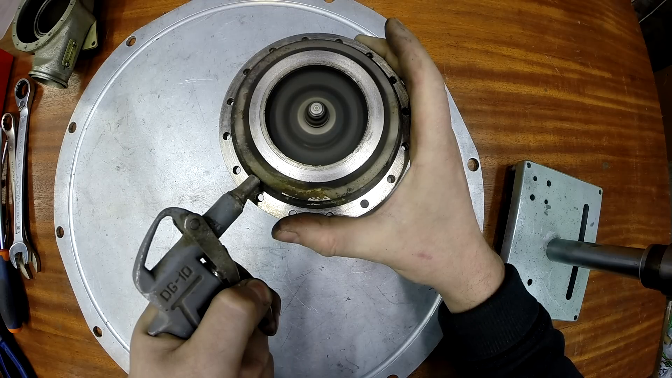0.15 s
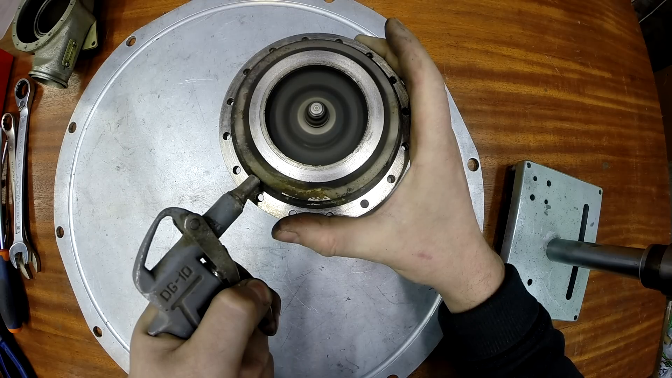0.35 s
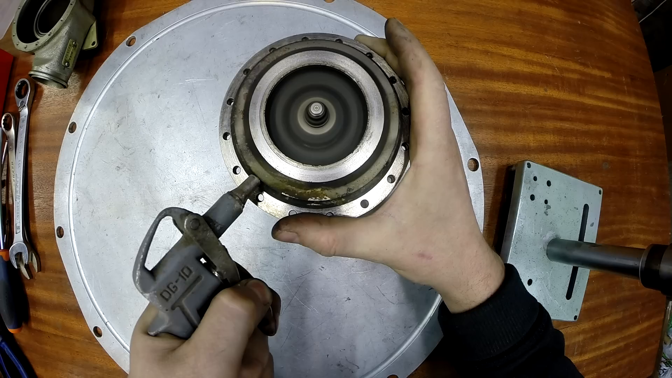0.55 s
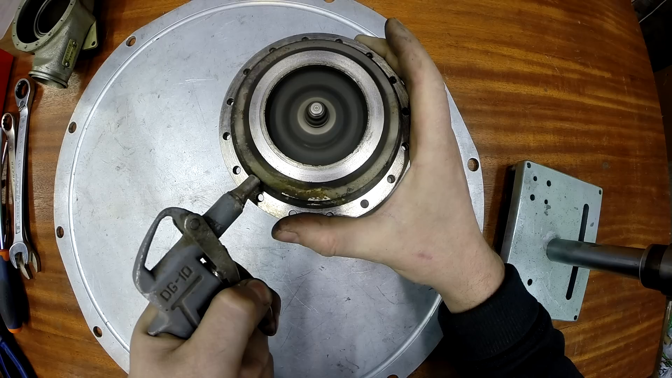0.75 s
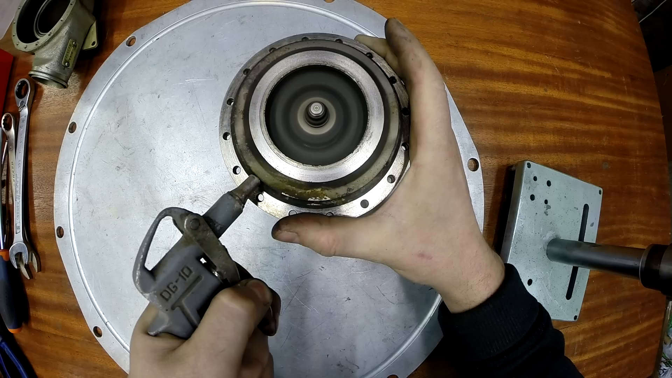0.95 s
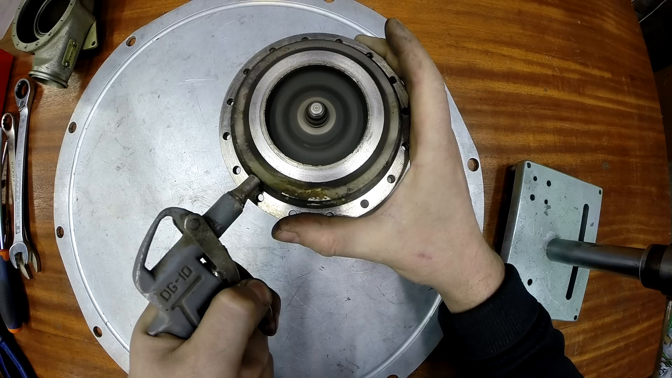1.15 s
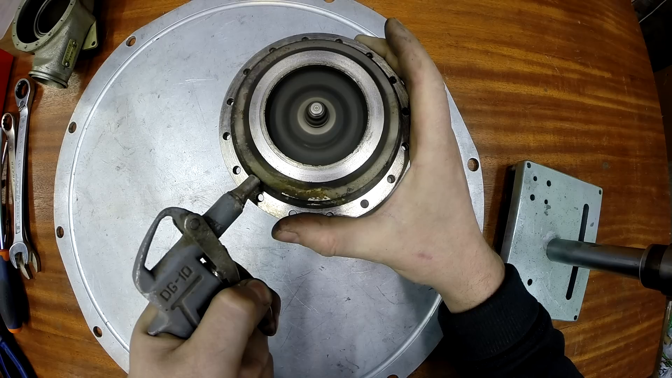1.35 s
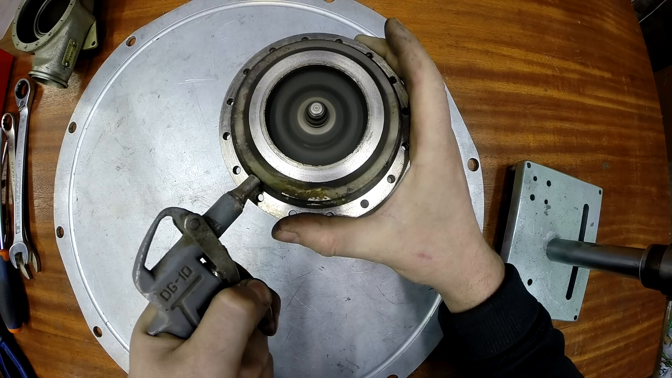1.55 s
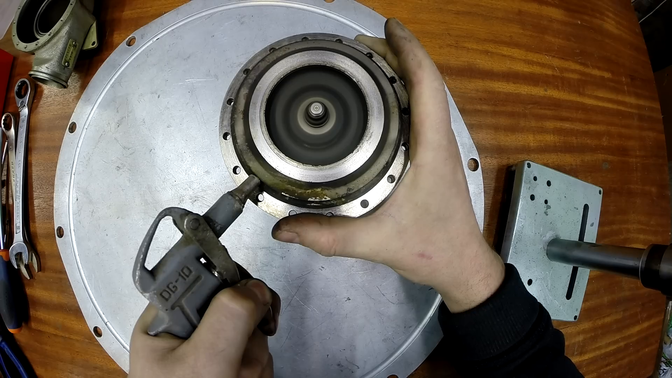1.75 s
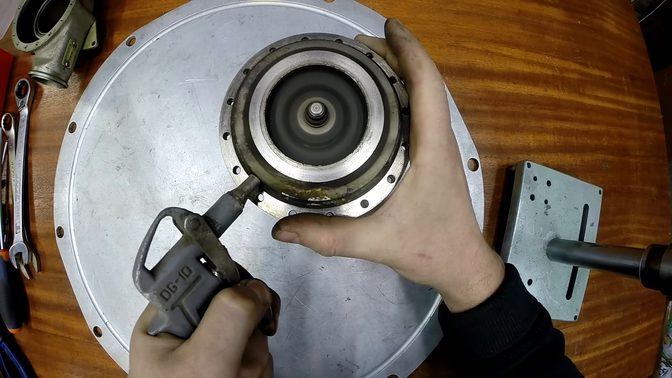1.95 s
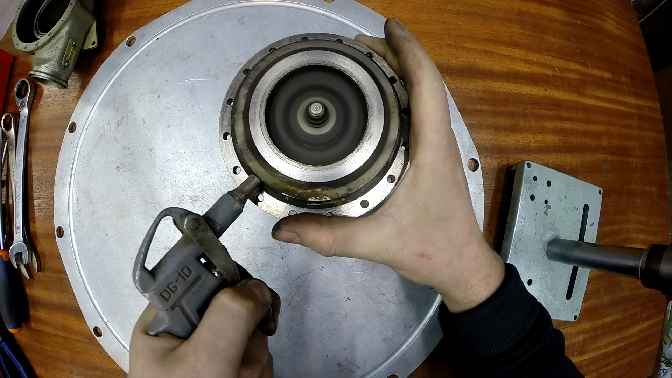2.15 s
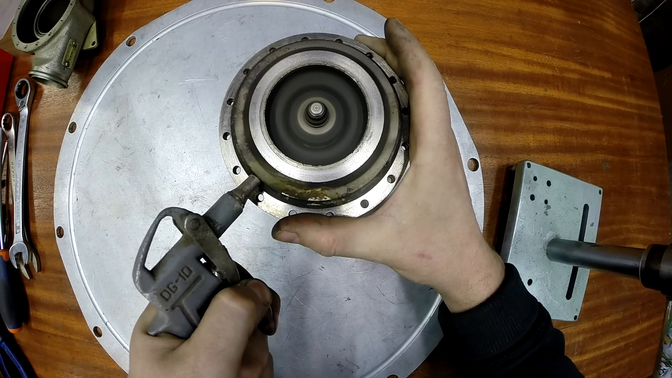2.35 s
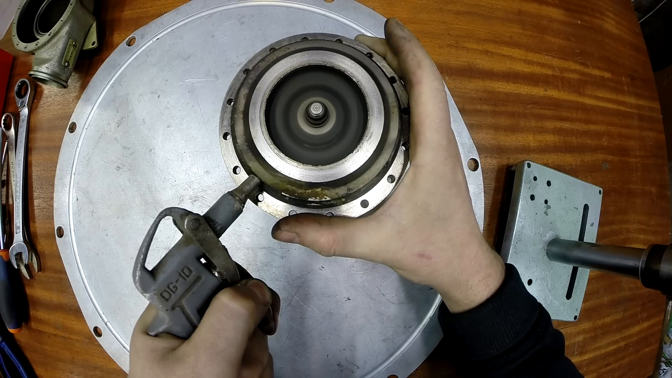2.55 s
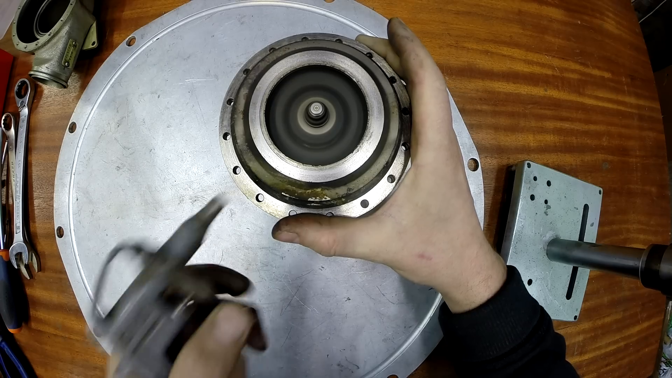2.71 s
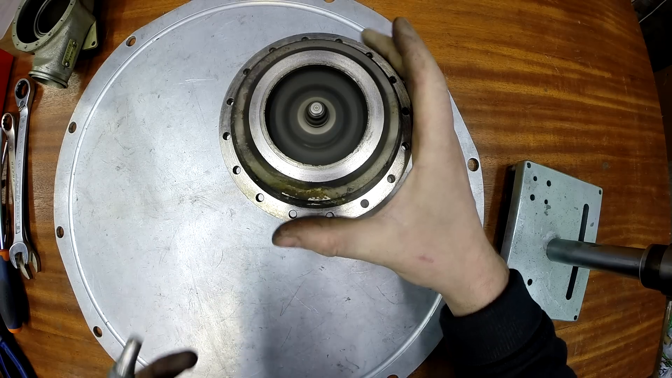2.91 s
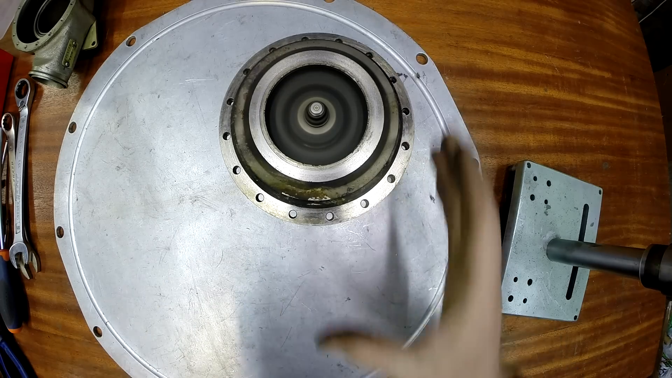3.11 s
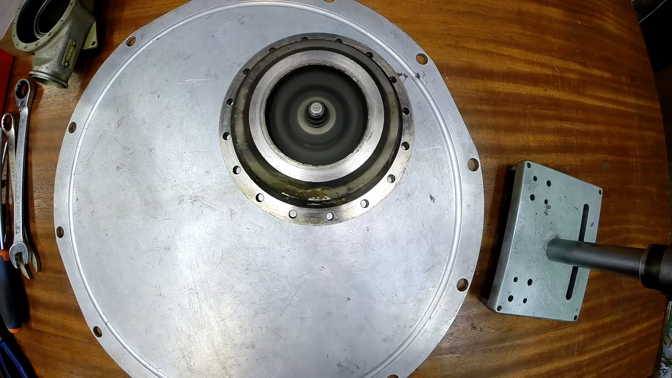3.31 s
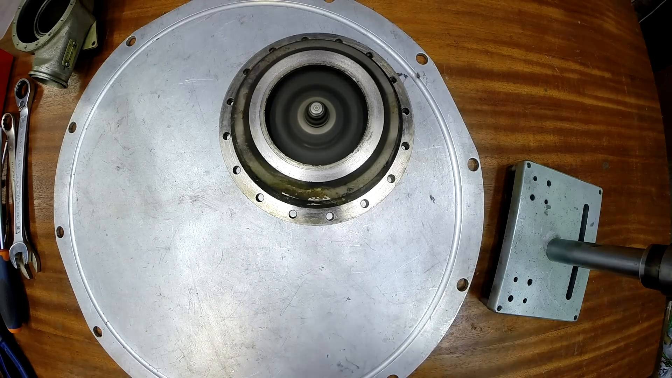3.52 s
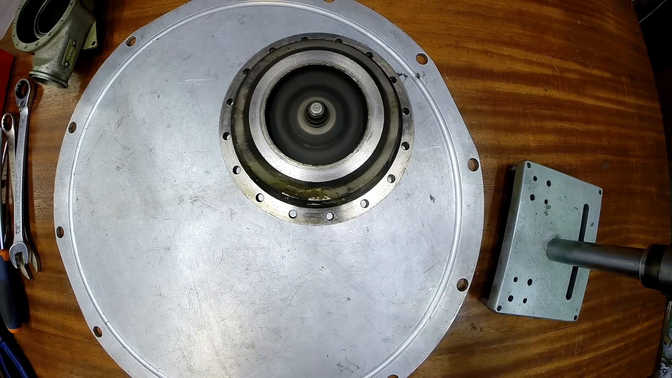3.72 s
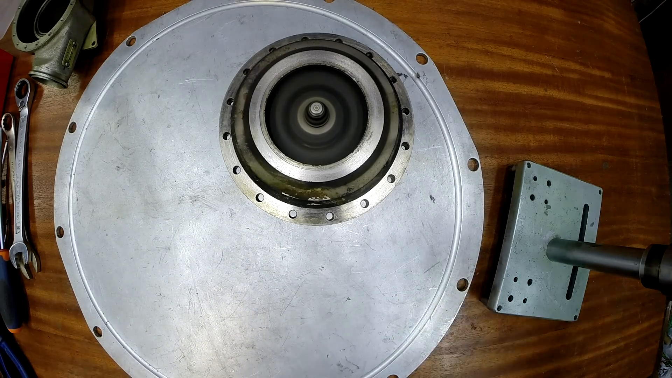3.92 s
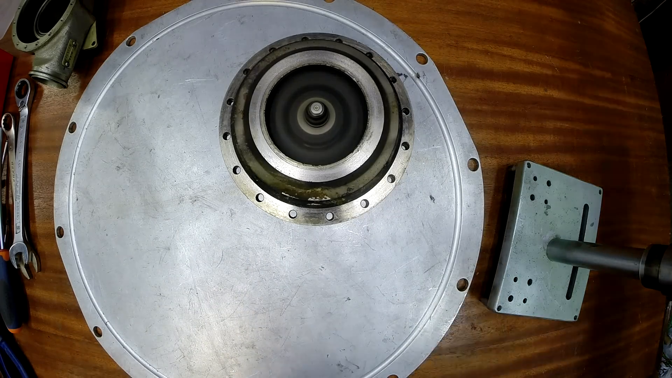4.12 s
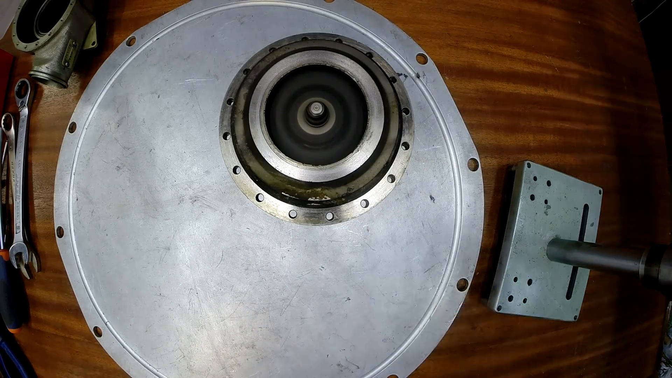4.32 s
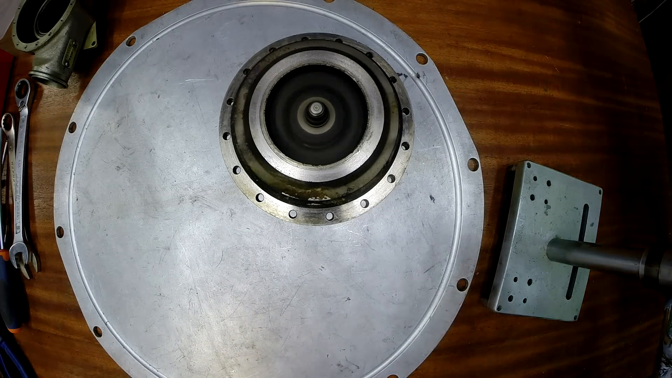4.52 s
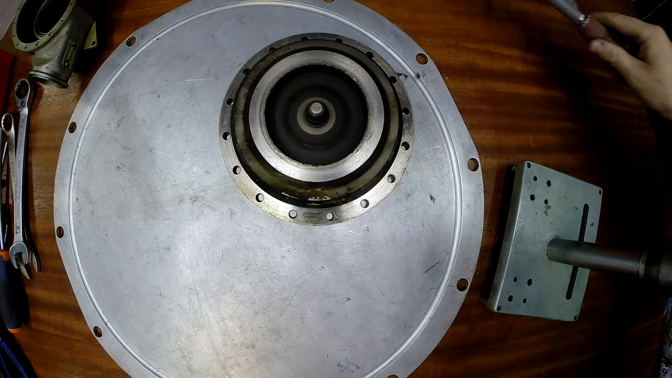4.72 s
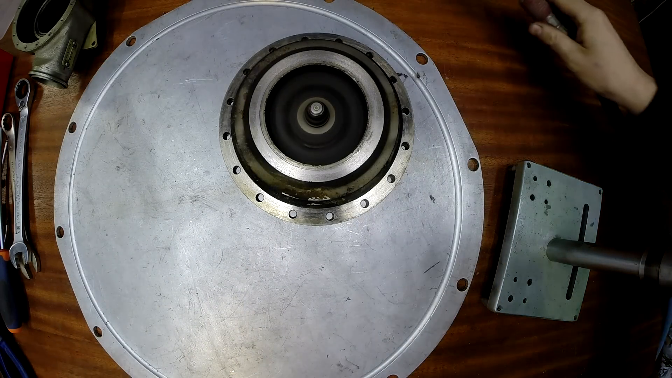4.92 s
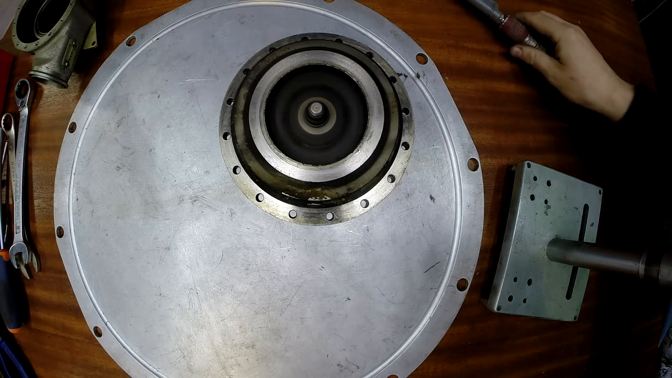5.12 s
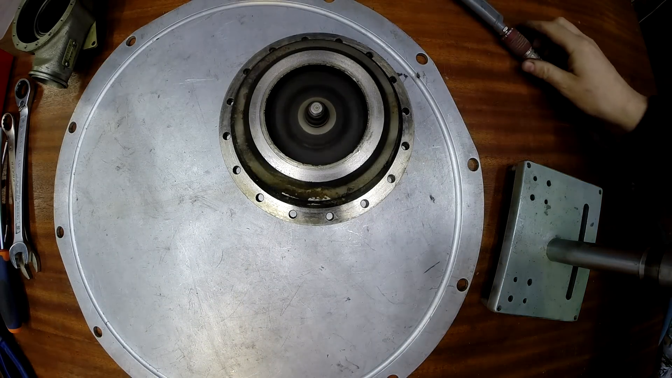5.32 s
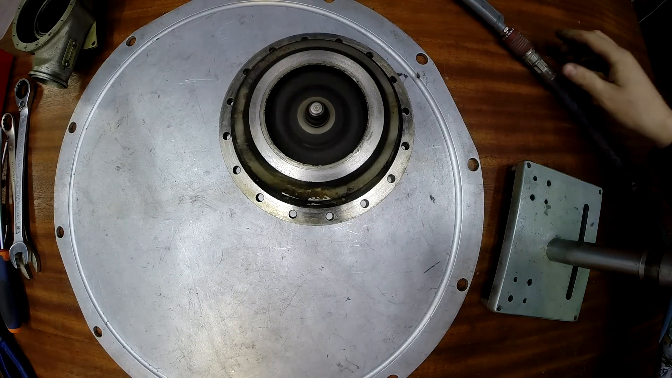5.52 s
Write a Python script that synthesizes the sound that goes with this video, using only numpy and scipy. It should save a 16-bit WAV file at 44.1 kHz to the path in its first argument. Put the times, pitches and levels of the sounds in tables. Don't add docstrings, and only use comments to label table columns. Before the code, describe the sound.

A loud, steady compressed-air hiss with a buzzing edge cuts off abruptly, leaving a small wheel's bearing singing downward, then knocks on a wooden bench.

```python
import sys
import numpy as np
from scipy import signal
from scipy.fft import rfft, irfft, next_fast_len
from scipy.io import wavfile
from scipy.ndimage import uniform_filter1d, map_coordinates

SR = 44100
rng = np.random.default_rng(int(sys.argv[2]) if len(sys.argv) > 2 else 0)


def digitize_waveform(pressure):
    field = np.atleast_2d(pressure).T
    bounded = np.clip(field, -1, 1)
    quanta = np.round(bounded * 32767).astype(np.int16)
    wavfile.write(sys.argv[1], SR, quanta)


def elevation(decibels):
    levels = np.asarray(decibels, float)
    return 10 ** (levels / 20)


N = 245195

BALLS = 3.62
BLADES = 33

# [f/Hz, level/dB per Hz]
RUMBLE = [(12, -36), (20, -18), (87, -7), (206, 0), (296, -9), (362, -1.5), (500, 1), (650, -15),
          (1100, -120)]
# [t/s, bench level/dB, hard part level/dB, click level/dB, time to fall 60 dB/s]
KNOCKS = [
    (4.542, -16.5, -6.5, -45, 0.13),
    (4.553, -23, -8, -53, 0.065),
    (4.578, -26, -2, -45, 0.2),
    (5.082, -15, 5, -20, 0.14),
    (5.089, -26.5, 14, -14, 0.082),
    (5.1, -26, 9.5, -30.5, 0.43),
    (5.125, -40, 17, -33, .1),
    (5.231, -4, -9, -23.5, 0.29),
    (5.254, -12.5, -21, -34, 0.21),
    (5.28, -25, -6, -36, 0.36),
]
# [f/Hz, width/Hz, level/dB]
BENCH = [(45, 28, -28), (96, 31, -5), (197, 20, -1.5), (303, 55, -1.5), (357, 49, 0), (449, 24, 4),
         (545, 64, -0.5)]
# [f/Hz, width/Hz, level/dB]
HARD_PART = [(450.5, 23, 6.5), (675, 49, -10), (730, 33, -11), (920, 156, -0.5), (1126, 89, -2.5),
             (1222, 84, -5), (1940, 240, -15), (2900, 1400, -19.5)]
# [t/s, level/dB, share of the upper modes/0-1]
CLINKS = [
    (5.085, -49, 0),
    (5.1, -46, 0.5),
    (5.121, -39, 0.86),
]
# [f/Hz, level/dB, time to fall 60 dB/s]
COUPLING = [(6180, -1.5, .2), (7000, -13, .2), (7391, -8, .2), (8160, -2, .3), (8425, -8, .3),
            (9868, -12, .3), (11010, -26, .2), (12000, -30, .2), (12900, -22, .4)]
# [t/s, peak level/dB]
TICKS = [
    (4.7032, -50),
    (4.7521, -43),
    (4.774, -42),
    (4.8085, -44),
]

# [f/Hz, width/Hz, level/dB]
PRESSED_CASING = [(262, 20, -48), (522, 18, -42), (499, 10, -46), (752, 24, -31), (990, 30, -29),
                  (2310, 220, -30.5), (2428, 30, -33), (4700, 700, -38)]
# [f/Hz, width/Hz, level/dB]
DISC = [(145, 20, -10.2), (198, 14, -11.8), (241, 38, -8.6), (303, 31, -11.0), (353, 29, -13.9),
        (396, 14, -11.6), (461, 20, -8.1), (522, 22, -16.9), (641, 30, -5.5), (740, 25, -3.2),
        (874, 35, 1.0), (980, 60, -1.0), (1106, 72, 3.1), (1304, 35, -7.1), (1347, 61, -7.0),
        (1560, 43, -17.7), (1716, 50, -19.7), (1902, 28, -0.1), (2112, 139, -14.0), (2386, 13, -23.1),
        (2824, 92, -12.6), (3189, 45, -24.6), (3589, 67, -17.8), (4427, 132, -21.5)]
# [f/Hz, width/Hz, level/dB]
CASING = [(2350, 60, -18), (2865, 60, -8), (3650, 70, -9), (4345, 110, -16), (4830, 200, -26),
          (6830, 40, -15), (6985, 45, -10), (7650, 60, -18), (8075, 60, -19), (9400, 50, -38),
          (11030, 60, -25), (12700, 25, -46), (13650, 490, -42)]
# [f/Hz, level/dB per Hz]
ROLLING = [(60, -5), (300, -1), (1000, -2), (1900, 3), (4000, 8), (7000, 5), (11000, -5), (15000, 0)]
# [f/Hz, level/dB per Hz]
GRIT = [(350, -16.5), (900, -15), (2500, -16.5), (6000, -19.5), (8200, -19), (9800, -42), (11700, -65),
        (15500, -49)]
BALL_DB = [-11.5, 1.5, 0, -.5, -5.5, -8, -7.5, -9.5, -4.5, -10, -14, -11, -10, -10, -10, -14, -6.5, -7.5,
           -11, -12, -11.5, -12, -9, -8]
BLADE_DB = [-10, -11, -20, -21, -18, -17.5, -6, -9, -24, -8.5, -12, -11.5, -11, -12.5, -6.5, -8.5, -8.5, -6,
            -9.5]
# [multiple of ball rate, multiple of shaft rate, level/dB, growth/dB per doubling of speed]
STRAYS = [(-7, 33, -9, 2), (0, 16, -13, 12), (0, 24, -15.5, 13)]

# [multiple of the shaft rate, level/dB]
CHOPS = [(2, 9), (13, 1.5), (15, 2), (17, 2), (21, 2), (26, 2), (34, 3), (67, 7)]
# [f/Hz, level/dB per Hz]
HISS = [(2530, -39), (4300, -14.5), (4740, -15.5), (5080, -19.5), (5390, -5), (5750, -3), (7410, -2),
        (7990, 2.5), (9650, -3), (10700, -4), (11600, -8), (12900, -7.5), (15600, -18)]
# [f/Hz, level/dB per Hz]
ROAR = [(59, -72.5), (100, -51), (135, -27.5), (214, -44), (257, -32), (318, -16), (514, -16.5),
        (616, -10.5), (739, -10), (1030, -2.5), (1410, -3.5), (2350, -5), (2920, -11), (3500, -3.5),
        (5200, -14.5), (6760, -46), (11400, -120)]
# [f/Hz, width/Hz, level/dB]
PASSAGES = [(1010, 78, -3.5), (1936, 130, -2.5), (3376, 184, -4), (4920, 200, -12), (5840, 330, -1),
            (6780, 110, 3), (7120, 130, 0), (7940, 320, -9.5), (8330, 49, -11), (8960, 73, -6.5),
            (9000, 51, -15.5), (9580, 35, -3.5), (10400, 37, -22.5), (10380, 48, -9.5), (10640, 67, -1),
            (12700, 120, -11)]
# [delay/s, level/dB]
ECHOES = [(.0011, -17), (.0023, -17), (.0037, -16), (.0052, -16), (.0071, -17), (.0096, -18), (.014, -19)]
# [t/s, from f/Hz, to f/Hz]
SPLITS = [(1.315, 9700, 11300), (1.78, 10200, 12000), (1.99, 8100, 10600), (2.06, 5000, 6500),
          (2.105, 5000, 12150)]


def unit(x):
    return x / np.sqrt(np.mean(x ** 2) + 1e-20)


def along(points, hz):
    f, db = np.transpose(points)
    return elevation(np.interp(np.log(hz + 1), np.log(f + 1), db))


def wobble(rate):
    knots = rng.standard_normal(int(N * rate / SR) + 4)
    return map_coordinates(knots, [np.arange(N) * rate / SR])


def filtered(x, response):
    m = next_fast_len(len(x) + SR // 4)
    return irfft(rfft(x, m) * response(np.fft.rfftfreq(m, 1 / SR)), m)[:len(x)]


def modes(table):
    def response(f):
        total = 0
        for k, (center, width, db) in enumerate(table):
            damping = 1j * f * width
            total = total + (-1) ** k * elevation(db) * damping / (center * center - f * f + damping)
        return total
    return response


def patchy(patchy_db):
    z = signal.stft(rng.standard_normal(N + 512), nperseg=512)[2]
    field = uniform_filter1d(rng.standard_normal(z.shape), 8, 0)
    field = uniform_filter1d(field, 10, 1)
    return signal.istft(z * elevation(patchy_db * unit(field)), nperseg=512)[1][:N]


def tone(angle, db, unsteady_db, rate):
    level = elevation(db + unsteady_db * wobble(rate))
    return level * np.sin(angle + rng.uniform(0, 2 * np.pi))


def speed():
    t = np.arange(N) / SR
    start, gain_per_s, top, knee = 69, 2.15, 73.47, 0.12
    driven = -knee * np.logaddexp(-(start + gain_per_s * t) / knee, -top / knee)
    shut_s, drag_per_s, rub = 2.692, 0.2983, 16.57
    coasting = (top + rub) * np.exp(-drag_per_s * (t - shut_s)) - rub
    return np.minimum(driven, coasting)


def valve():
    after = np.maximum(np.arange(N) / SR - 2.685, 0)
    pressure = elevation(-520 * after)
    tail = elevation(-45.5 - 130 * after) * (after > 0)
    return pressure, tail


def shop():
    t = np.arange(N) / SR
    boom_db, boom_t60_s = -35, 0.99
    fading = 0
    for start, db, *_ in KNOCKS:
        fading = fading + elevation(db + boom_db - 60 * np.abs(t - start) / boom_t60_s) * (t > start)
    boom = unit(filtered(rng.standard_normal(N), modes([(40, 16, -5.0), (91, 33, -4)])))
    rumble = unit(filtered(rng.standard_normal(N), lambda f: along(RUMBLE, f)))
    return elevation(-56.5) * rumble + fading * boom


def clinks():
    out, t = np.zeros(N + SR), np.arange(SR // 5) / SR
    held = (1 - np.exp(-(t / 0.0024) ** 2)) / (1 + (t / 0.035) ** 6)
    for start, db, upper in CLINKS:
        share = np.clip(upper, 0, 1)
        ring = 0
        for hz, level, t60 in COUPLING:
            weight = share if hz > 7000 else 1.3 - share
            drift = np.cumsum(rng.normal(0, 0.04, len(t)))
            ring = ring + weight * elevation(level - 60 * t / t60) * np.sin(2 * np.pi * hz * t + drift)
        out[round(start * SR):][:len(t)] += elevation(db) * held * ring
    return out[:N]


def ticks():
    out, t = np.zeros(N + SR), np.arange(SR // 5) / SR
    wood = modes([(8700, 1200, 0), (12000, 3500, -5)])
    for start, db in TICKS:
        tick = rng.standard_normal(len(t)) * (elevation(-60 * t / 0.027) + 0.22 * elevation(-60 * t / 0.18))
        out[round(start * SR):][:len(t)] += elevation(db + 3.0) * filtered(tick, lambda f: np.abs(wood(f)) ** 2)
    return out[:N]


def scrape():
    late = np.arange(N) / SR - 4.83
    level_db = -52 + np.minimum(150 * late, -250 * late)
    rasp = rng.standard_normal(N) * elevation(2.8 * wobble(150))
    wood = modes([(3400, 1500, 0), (6000, 3000, -8)])
    return elevation(level_db) * unit(filtered(rasp, lambda f: wood(f) / (1 + (f / 8000) ** 6)))


def knocks():
    out, t = np.zeros(N + SR), np.arange(SR // 3) / SR

    def soft(hz):
        return lambda f: 1 / (1 + 1j * f / hz) ** 3

    for start, db, hard_db, click_db, t60 in KNOCKS:
        blow = 1.45 * rng.standard_normal(len(t)) * elevation(-60 * t / t60)
        blow[0] = 24
        body = filtered(blow, modes(BENCH)) + elevation(hard_db) * filtered(blow, modes(HARD_PART))
        click = rng.standard_normal(len(t)) * elevation(-60 * t / 0.069)
        click = filtered(click, modes([(6500, 1400, 5.5), (3200, 1400, -11)]))
        spot = out[round(start * SR):][:len(t)]
        spot += elevation(db + 5.5) * filtered(body, soft(3100))
        spot += elevation(db + click_db) * filtered(click, soft(9400))
    return out[:N]


def bearing_tones():
    rows = []
    for k, db in enumerate(BALL_DB):
        rows.append((k + 1, 0, db, 7.5 - 2.4 * np.log2(k + 1)))
    for k, db in enumerate(BLADE_DB):
        rows.append((k - 6, BLADES, db, 9.5))
    return rows + STRAYS


def bearing(turn):
    octaves = np.maximum(np.log2(speed() / 48), -1.2)
    grip = 1 / (1 + np.exp((np.arange(N) / SR - 3.02) / 0.14))
    shaft = 2 * np.pi * turn
    ball = BALLS * shaft + 0.07 * wobble(30)

    shake = 0
    for balls, turns, db, slope in bearing_tones():
        level_db = db + slope * octaves + 3 * grip * (turns == BLADES)
        shake = shake + tone(balls * ball + turns * shaft, level_db, unsteady_db=1.6, rate=24)
    sing_db = -28.5 + 6.5 * octaves - 11 * grip - 5 * valve()[0]

    swell_db = 2.5 * np.cos(ball) + 1.0 * np.cos(shaft) + 0.6 * wobble(25)
    rough = patchy(patchy_db=0.4) * elevation(swell_db)
    low_body, high_body = modes(DISC[:19] + CASING[:5]), modes(CASING[5:])
    roll = unit(filtered(rough, lambda f: along(ROLLING, f) * low_body(f)))
    ring = unit(filtered(rough, lambda f: along(ROLLING, f) * high_body(f)))
    grit = unit(filtered(patchy(patchy_db=1.0), lambda f: along(GRIT, f)))
    noise = roll + elevation(-8 + 6.5 * octaves) * ring + elevation(-5.5 + 5.5 * octaves) * grit
    roll_db = -40.5 + 5.5 * octaves - 11 * grip
    return filtered(elevation(sing_db) * shake, modes(DISC)) + elevation(roll_db) * noise


def whistle(turn):
    tones = 0
    for order in [BLADES, 2 * BLADES, BALLS, 2 * BALLS, 3 * BALLS, 4 * BALLS]:
        tones = tones + tone(2 * np.pi * order * turn, 0, unsteady_db=1, rate=12)

    def casing(f):
        return sum(elevation(db) * modes([(hz, width, 0)])(f) ** 2 for hz, width, db in PRESSED_CASING)
    return filtered(valve()[0] * tones, casing)


def chopping(turn):
    uneven_db = rng.normal(-3, 2.5, 200)
    uneven_db = uneven_db - 12 * (np.arange(200) > 36)
    for k, db in CHOPS:
        uneven_db[int(k)] = db
    pattern = irfft(elevation(uneven_db) * np.exp(2j * np.pi * rng.random(200)), 8192) * 4096
    return np.interp(turn % 1 * 8192, np.arange(8192), pattern, period=8192)


def jet(turn):
    pressure, tail = valve()
    chop = chopping(turn)
    air = patchy(patchy_db=0.35) + elevation(-27.5 + 1.9 * wobble(8.73)) * chop

    def passages(f):
        echoes = sum(elevation(db) * np.exp(-2j * np.pi * f * delay) for delay, db in ECHOES)
        return (0.7 + np.abs(modes(PASSAGES)(f))) * (1 + echoes)
    hiss = unit(filtered(air, lambda f: along(HISS, f) * passages(f)))
    roar = unit(filtered(air, lambda f: along(ROAR, f) * passages(f)))
    flutter = elevation(0.3 * wobble(8.37) + 0.37 * wobble(90))
    shut = np.clip((2.83 - np.arange(N) / SR) / 0.07, 0, 1)
    hiss_db, roar_db, tail_roar_db = -19.5, -5.5, -13
    hiss_level = elevation(hiss_db) * pressure + tail
    roar_level = elevation(hiss_db + roar_db) * pressure + elevation(tail_roar_db) * tail
    return flutter * shut * (hiss_level * hiss + roar_level * roar)


def scene():
    turn = np.cumsum(speed()) / SR
    hose = clinks() + ticks() + scrape()
    mono = shop() + hose + knocks() + bearing(turn) + whistle(turn) + jet(turn)
    t, noise = np.arange(N) / SR, rng.standard_normal(N)
    apart = 0
    for middle, low, high in SPLITS:
        burst = noise * (np.abs(t - middle) < 0.014)
        apart = apart + elevation(-21) * filtered(burst, lambda f: (f > low) * (f < high))
    return np.array([mono + apart, mono - apart])


def low_pass(x):
    return signal.sosfilt(signal.butter(12, 15750, fs=SR, output="sos"), x)


def record(dry):
    mix = np.array([filtered(x, lambda f: f < 15290) for x in dry])
    return low_pass(mix)


dry = scene()
out = record(dry)
digitize_waveform(out)
```